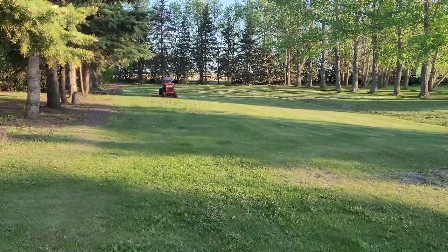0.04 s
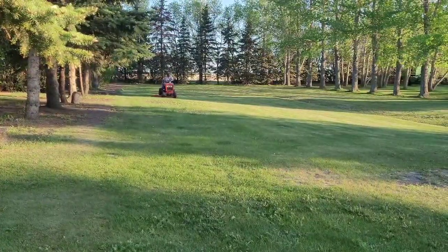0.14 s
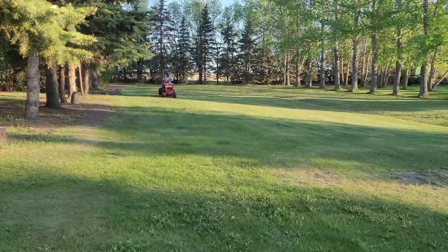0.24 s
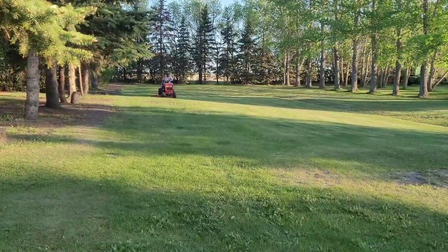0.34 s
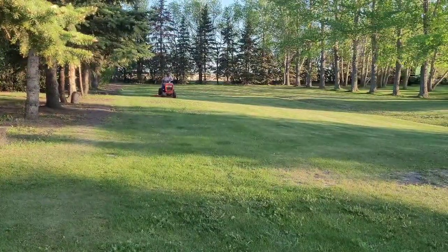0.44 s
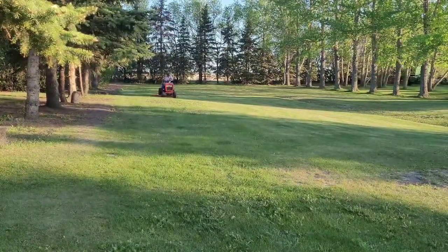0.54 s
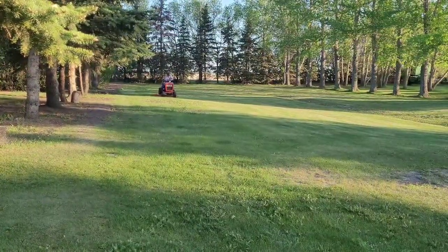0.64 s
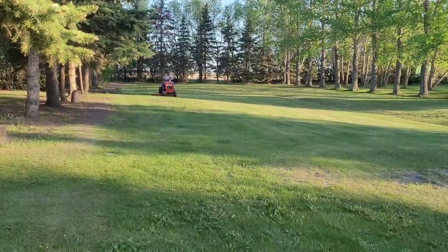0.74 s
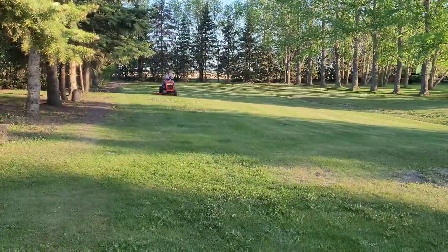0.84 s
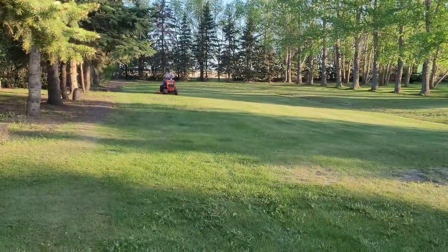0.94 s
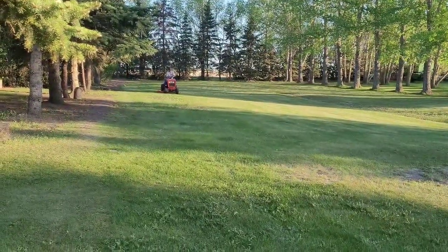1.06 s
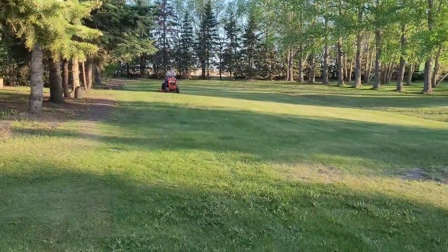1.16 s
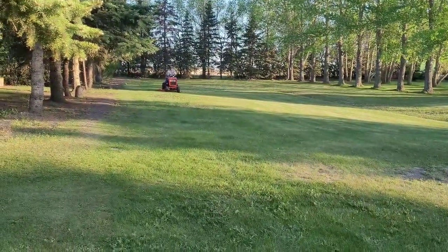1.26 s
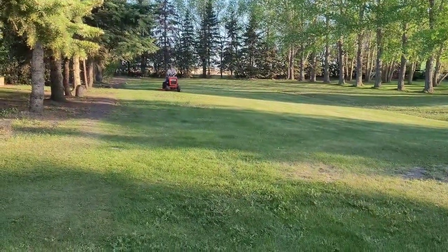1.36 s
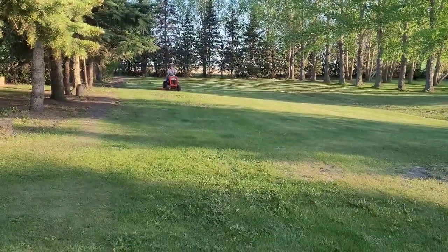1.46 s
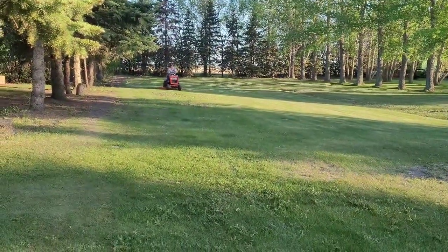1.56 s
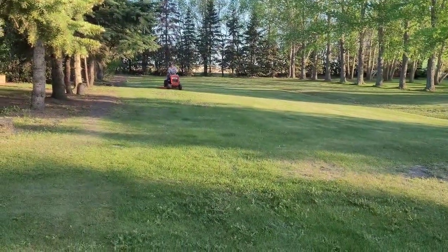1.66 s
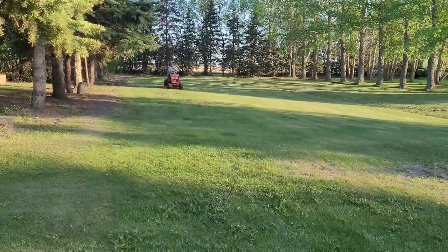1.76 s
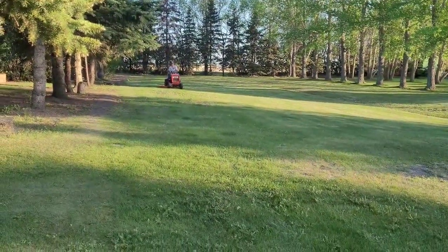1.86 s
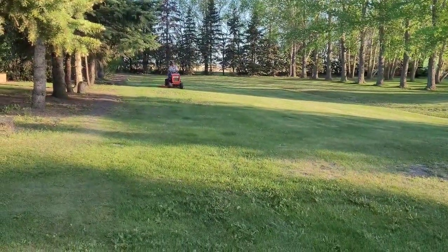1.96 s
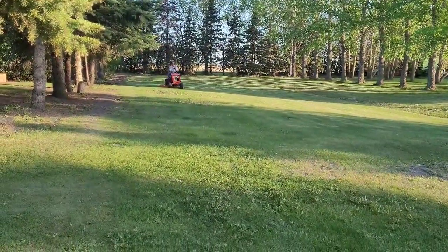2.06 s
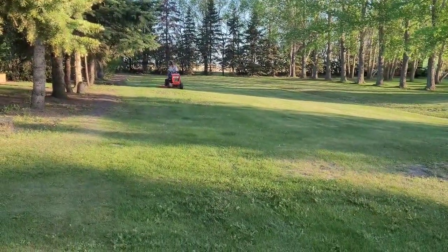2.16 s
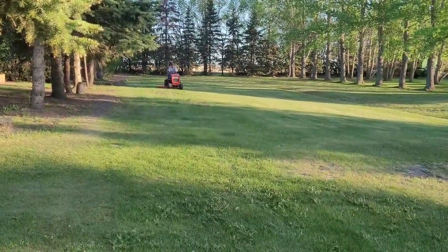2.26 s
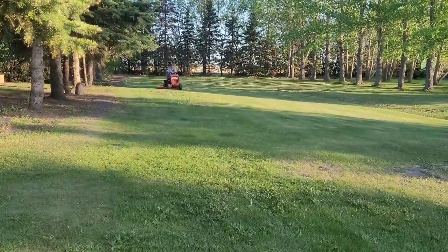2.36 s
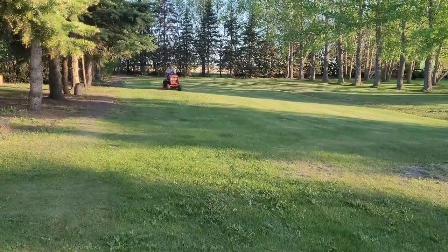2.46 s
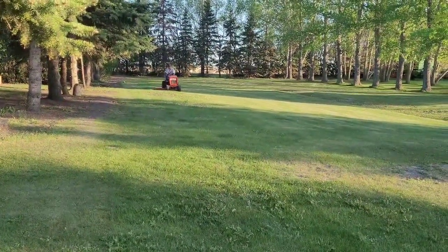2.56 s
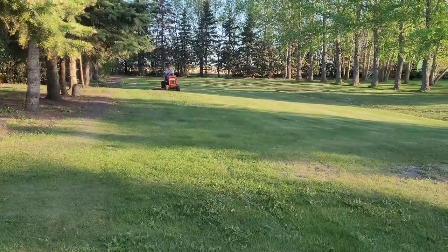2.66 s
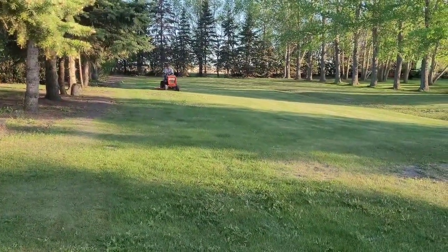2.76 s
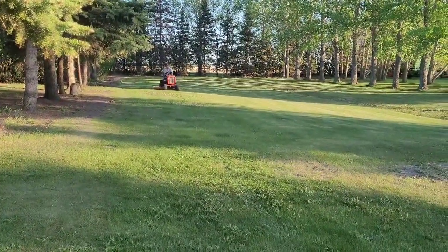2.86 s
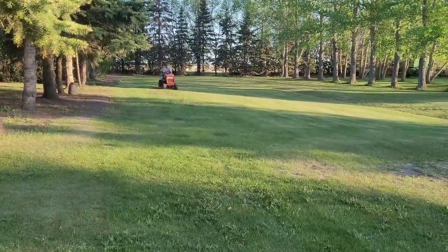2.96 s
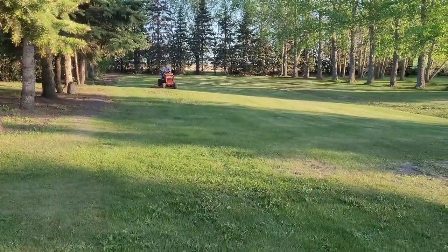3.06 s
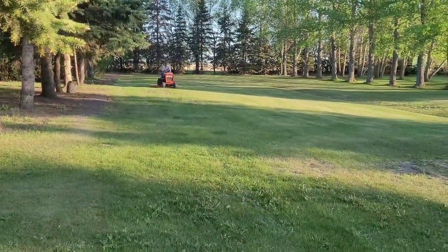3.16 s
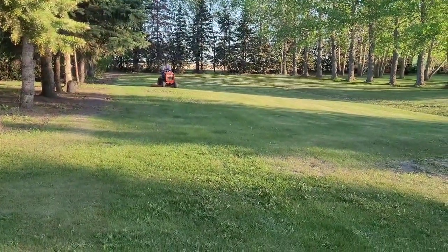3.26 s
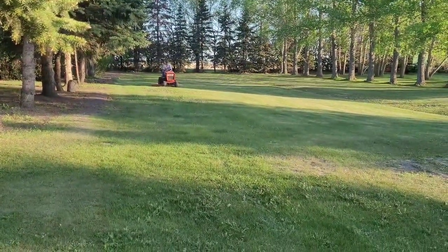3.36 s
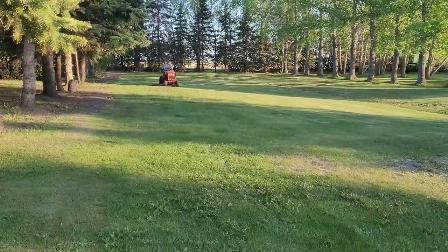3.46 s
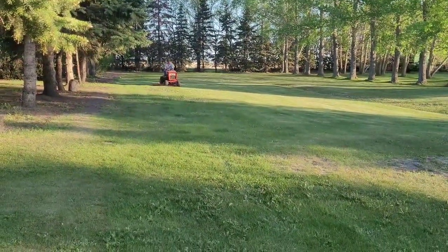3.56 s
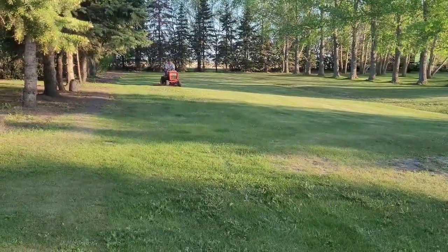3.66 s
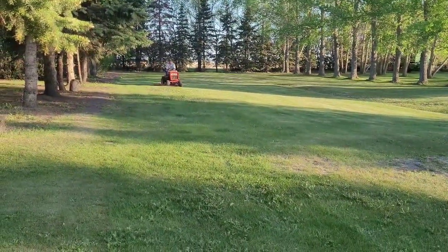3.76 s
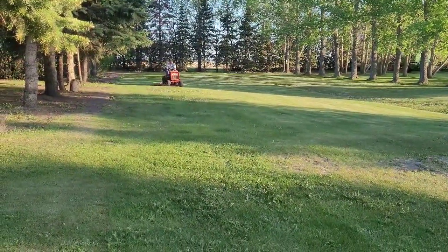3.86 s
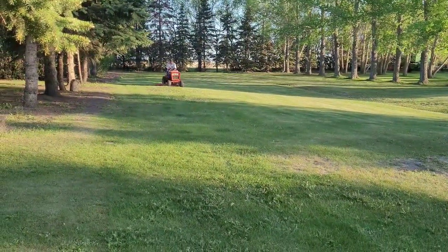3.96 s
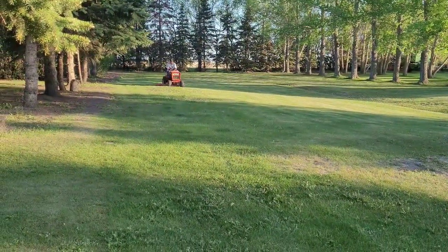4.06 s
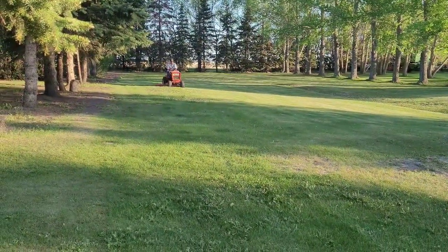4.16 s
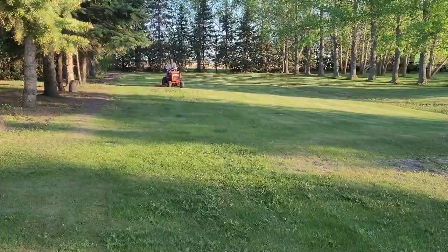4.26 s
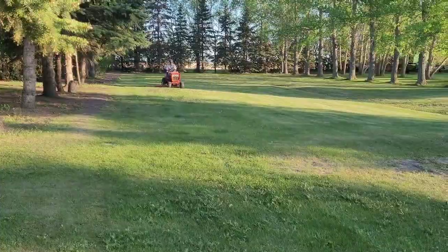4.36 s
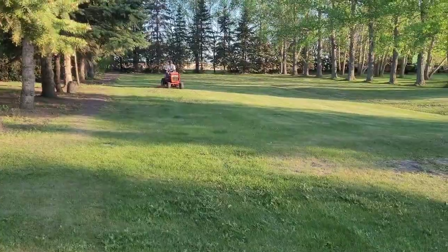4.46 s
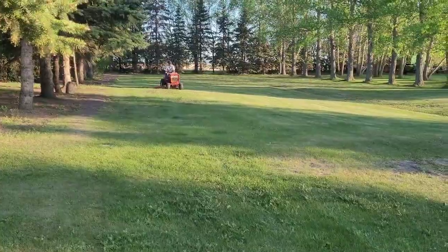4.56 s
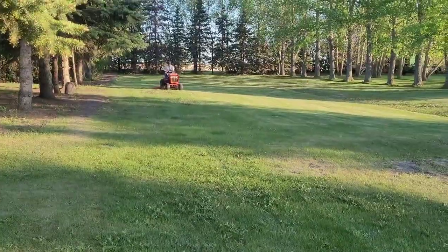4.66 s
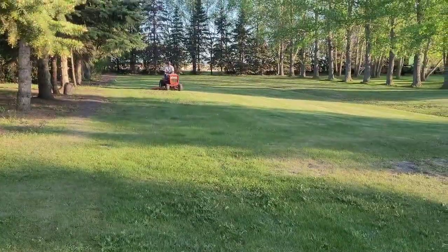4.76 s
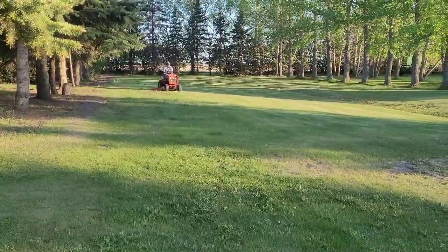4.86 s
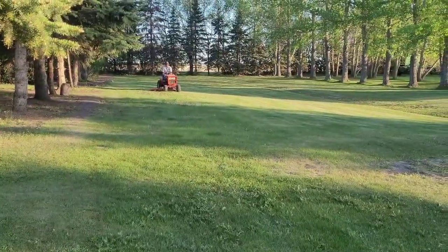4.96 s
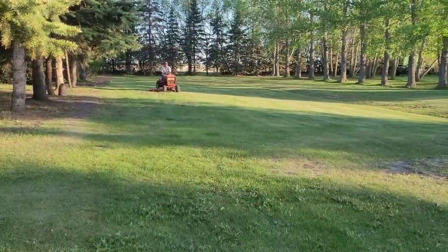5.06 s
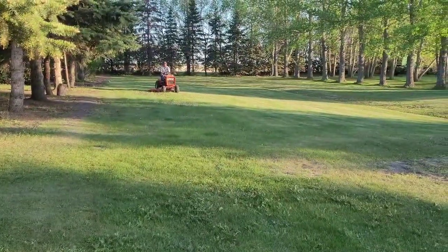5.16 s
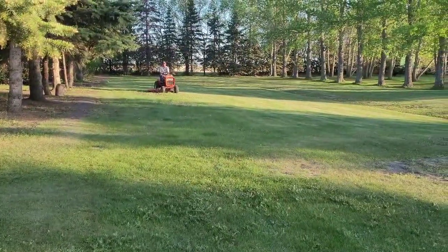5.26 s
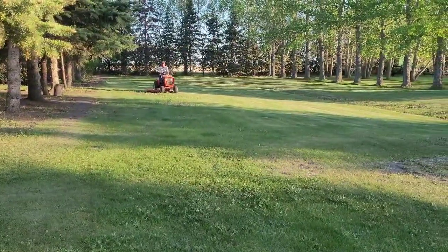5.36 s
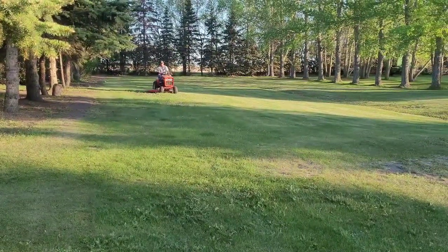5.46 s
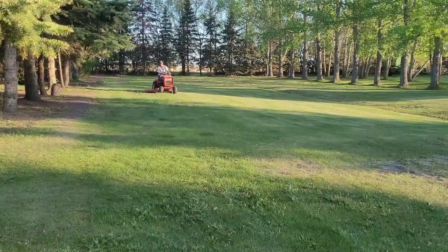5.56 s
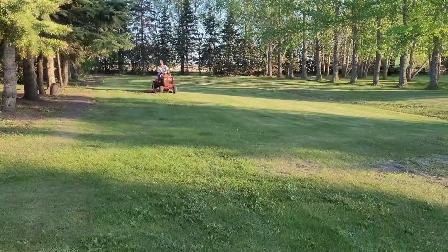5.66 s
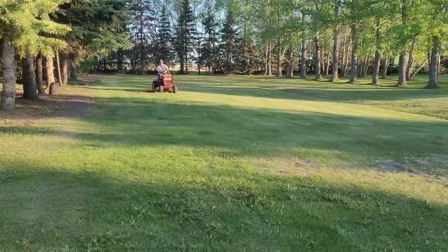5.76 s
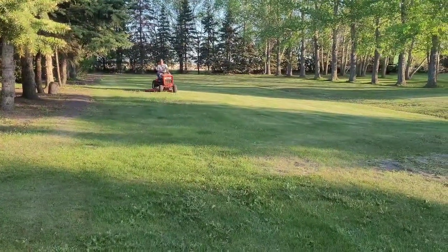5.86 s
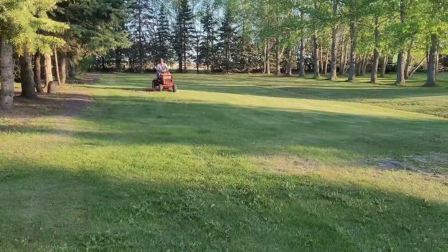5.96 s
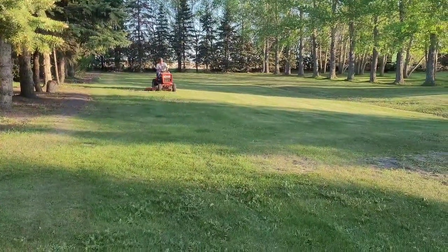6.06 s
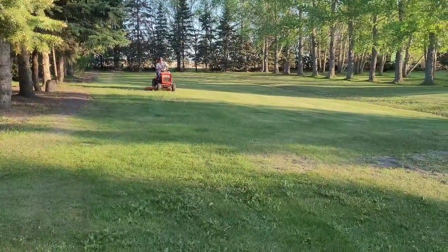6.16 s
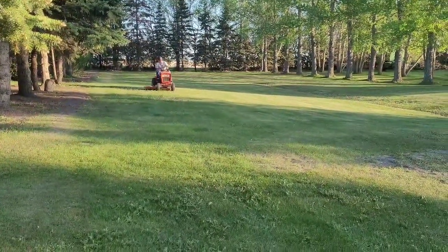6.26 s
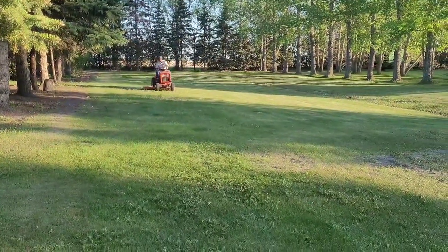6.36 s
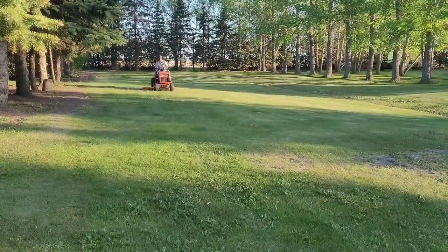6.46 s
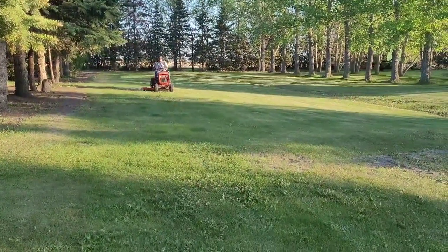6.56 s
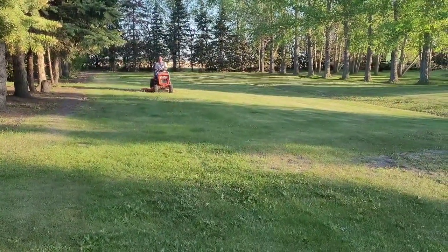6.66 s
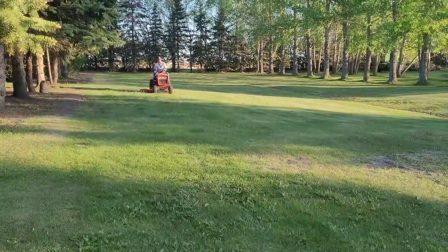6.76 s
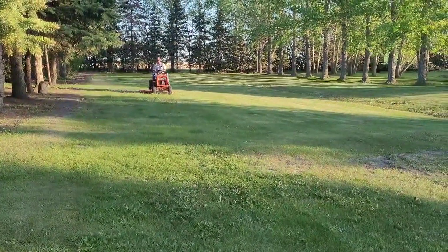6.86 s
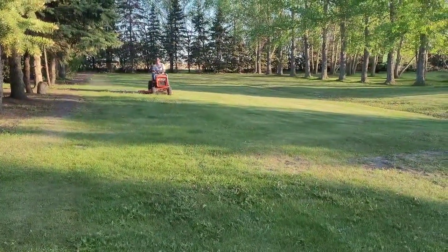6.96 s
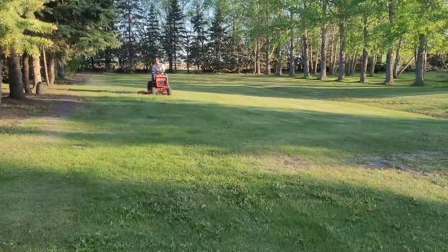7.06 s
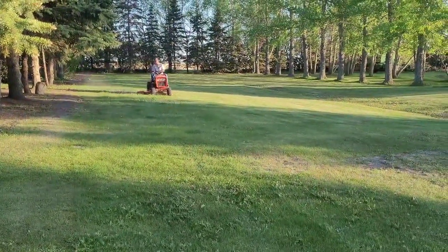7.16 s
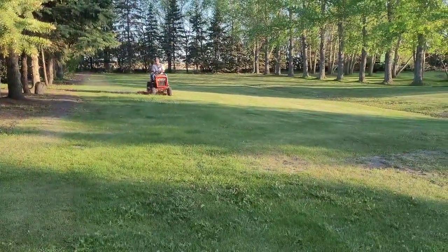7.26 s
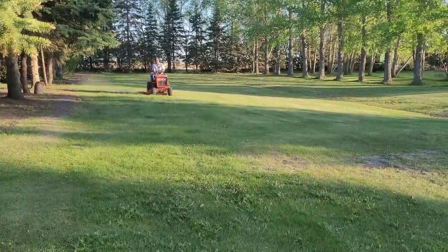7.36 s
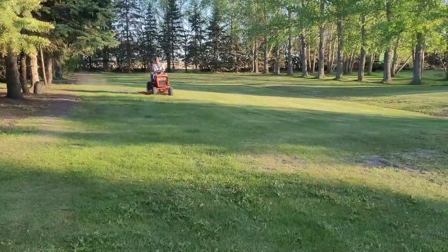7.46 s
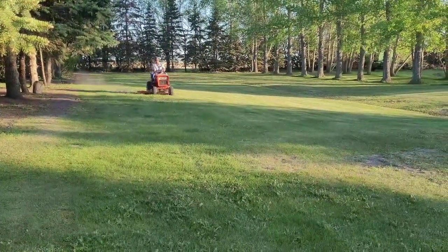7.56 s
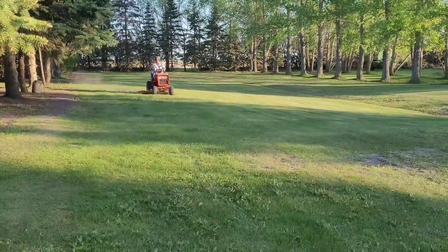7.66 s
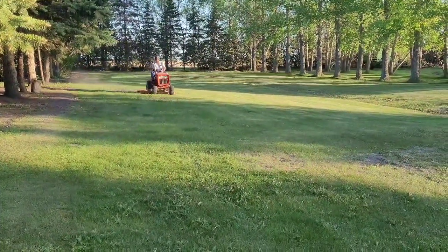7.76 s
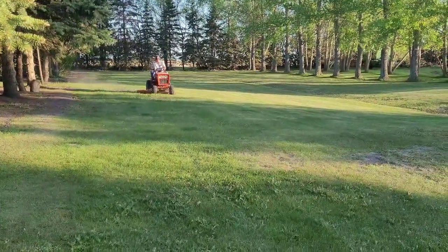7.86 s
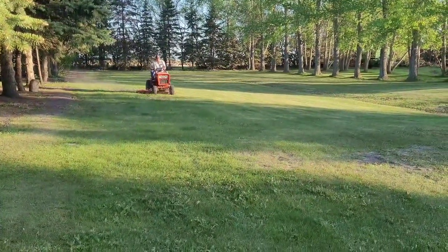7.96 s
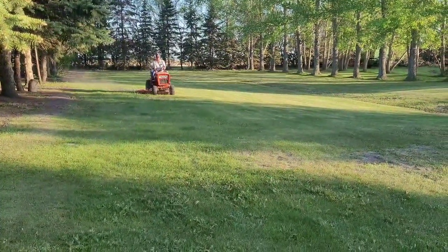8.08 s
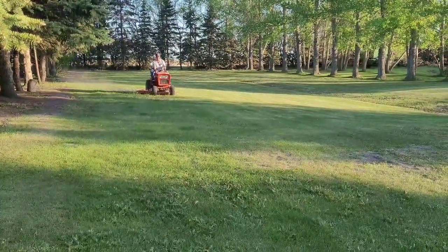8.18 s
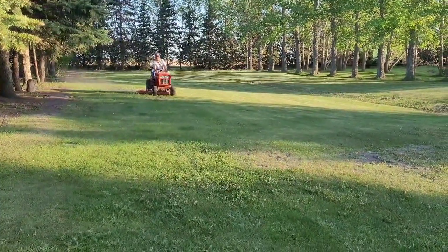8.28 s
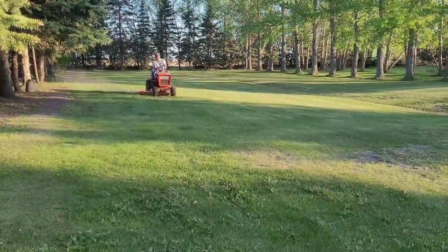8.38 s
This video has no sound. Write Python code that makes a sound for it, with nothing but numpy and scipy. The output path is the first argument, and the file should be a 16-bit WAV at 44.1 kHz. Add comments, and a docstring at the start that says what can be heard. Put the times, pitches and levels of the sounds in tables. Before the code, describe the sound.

A distant lawn tractor engine putters, sags, then sputters and climbs to working speed as it comes closer.

```python
"""A two-cylinder garden tractor approaches across a lawn ringed by trees. It idles, each firing a thump of
muffler resonance, a crack of turbulent gas and a soft puff, over the rush of the fan and the hiss of the
running gear; the trees scatter back a faint echo. The engine sags, and after 3 s the throttle opens.
One cylinder misfires around 4 s, then the engine barks and pulls up to working speed by 6 s:
the puffs vanish, the muffler's resonances climb, and it stumbles briefly once more near 7 s."""
import sys
import numpy as np
from scipy import signal
from scipy.fft import rfft, irfft, next_fast_len
from scipy.io import wavfile
from scipy.ndimage import map_coordinates

SR = 44100
rng = np.random.default_rng(int(sys.argv[2]) if len(sys.argv) > 2 else 0)


def put_to_file(sound):
    """Save the sound as 16-bit audio at rate SR, in the file named by the first command-line argument."""
    columns = np.atleast_2d(sound).T  # one column per channel
    safe = np.clip(columns, -1, 1)
    whole_steps = np.round(safe * 32767)
    wavfile.write(sys.argv[1], SR, whole_steps.astype(np.int16))


N = 371322
TIME = np.arange(N) / SR
PULSE = 8192  # samples in the sound of one firing
IDLE_RATE, WORKING_RATE = 24.6, 42  # firings per s
START_DISTANCE_M, DRIVE_M_PER_S = 39.6, 1.754


def from_db(db):
    """Amplitude ratio of a level in decibels."""
    return 10 ** (np.asarray(db) / 20)


def unit_power(x):
    """Normalisation to a mean square of 1."""
    return x / np.sqrt(np.mean(x ** 2) + 1e-20)


def at_time(points, times):
    """Linear interpolation in time."""
    return np.interp(times, *np.transpose(points))


def at_hz(points, size=PULSE):
    """Interpolation in log frequency onto an FFT grid."""
    hz, value = np.transpose(points)
    return np.interp(np.log(np.arange(size // 2 + 1) * SR / size + 1), np.log(hz), value)


def minimum_phase(db):
    """Causality: responses with these magnitudes that ring only after the excitation."""
    cepstrum = irfft(np.log(from_db(db)))
    cepstrum[..., 1:PULSE // 2] *= 2
    cepstrum[..., PULSE // 2 + 1:] = 0
    return np.exp(rfft(cepstrum))


def noise_pair(correlation, shape):
    """Partial coherence: two white noises with a shared part."""
    mid, side = rng.standard_normal((2, *shape))
    mid *= np.sqrt((1 + correlation) / 2)
    side *= np.sqrt((1 - correlation) / 2)
    return np.array([mid + side, mid - side])


def superpose(pulses, times):
    """Linear superposition of one pulse per firing."""
    out = np.zeros(N + 3 * PULSE)
    for pulse, t in zip(pulses, times):
        start = PULSE + int(t * SR)
        out[start:start + PULSE] += pulse
    return out[PULSE:PULSE + N]


# engine speed: t/s, firing rate/Hz
FIRING_RATE = [(0.0, 24.611), (0.745, 24.644), (1.348, 25.06), (1.814, 21.784), (1.951, 22.572),
               (2.717, 19.452), (3.153, 18.719), (3.641, 22.835), (4.018, 22.795), (4.394, 21.322),
               (4.807, 23.601), (5.218, 28.515), (5.825, 37.44), (6.146, 40.817), (6.707, 42.967),
               (7.03, 41.191), (7.731, 42.626), (8.188, 41.439), (8.42, 41.672)]
def firing_rate(times):
    """The repetition rate of the exhaust pulses is proportional to engine speed."""
    return at_time(FIRING_RATE, times)


# throttle position: t/s, opening (0 to 1)
THROTTLE = [(0, .03), (1.4, 0.15), (3.05, 0), (3.2, 0.56), (3.62, 0.76), (3.88, 0.89), (4.4, 0.74),
            (4.55, 0.84), (5.5, 1), (6.15, 0.73), (6.65, 0.54), (8.42, 0.41)]
def throttle(times):
    """The throttle meters the charge: it opens in steps, then eases near working speed."""
    return at_time(THROTTLE, times)


def source_level(times, idle_db, revs_db, throttle_db):
    """Level rises with engine speed and throttle, and by the inverse-square law as the tractor nears."""
    revs = (firing_rate(times) - IDLE_RATE) / (WORKING_RATE - IDLE_RATE)
    nearness_db = -20 * np.log10(1 - DRIVE_M_PER_S * times / START_DISTANCE_M)
    return idle_db + revs_db * revs + throttle_db * throttle(times) + nearness_db


def tree_echo(sound, echo_db=-10.5, t60_s=1.0, build_s=0.043, band_hz=(256, 6100)):
    """Scattering by trunks returns a dull, diffuse echo; long waves diffract around them."""
    age = np.arange(SR) / SR
    tail = noise_pair(0.68, age.shape) * from_db(-60 * age / t60_s) * (1 - np.exp(-age / build_s))
    tail /= np.sqrt(np.sum(tail ** 2) / 2)
    tail = signal.sosfilt(signal.butter(2, band_hz, "band", fs=SR, output="sos"), tail)
    return from_db(echo_db) * signal.fftconvolve(sound, tail, axes=1)[:, :N]


def fluttering_noise(spectrum, level_db, flutter_db, correlation, flutter_hz=22):
    """Random amplitude modulation: steady noise flutters a little on its way over the grass."""
    size = next_fast_len(N)
    white = rfft(noise_pair(correlation, (size,)))
    noise = irfft(white * from_db(at_hz(spectrum, size)), size)[:, :N]
    knots = rng.standard_normal(int(N / SR * flutter_hz) + 4)
    flutter = unit_power(map_coordinates(knots, [TIME * flutter_hz], order=2, mode="nearest"))
    return unit_power(noise) * from_db(level_db + flutter_db * flutter)


# relative spectral density of the running gear: f/Hz, level/dB
GEAR_SPECTRUM = [(1200, -12), (1900, -3.5), (2300, 2), (2700, 5), (3050, 6), (3400, 2.5), (4050, 2.5),
                 (4500, -5), (5700, 0), (6900, -7.5), (7900, -8), (9300, -14), (12500, -20.5), (15500, -39)]
def gear_hiss():
    """The running gear radiates broadband noise, strongest near 3 kHz."""
    level_db = source_level(TIME, idle_db=-56.5, revs_db=7.5, throttle_db=2.5)
    return fluttering_noise(GEAR_SPECTRUM, level_db, flutter_db=1.1, correlation=0.67)


# relative spectral density of the fan: f/Hz, level/dB
FAN_SPECTRUM = [(25, 8), (60, 6.5), (150, 10), (300, 9.5), (430, -4.5), (560, 1), (720, 1.5), (850, -0.5),
                (980, -9.5), (1150, -1), (1400, 1), (1620, -14), (1900, -4), (2600, -29)]
def fan_rush():
    """Turbulence in the fan's airflow radiates low broadband noise."""
    level_db = source_level(TIME, idle_db=-49, revs_db=10.5, throttle_db=4)
    return fluttering_noise(FAN_SPECTRUM, level_db, flutter_db=0.75, correlation=0.88)


# swells and dips of the thump: t/s, level/dB
THUMP_SWELL = [(0, -.5), (1.35, 0), (2.1, -0.5), (2.35, 1.6), (3.9, -1), (5.5, 1), (6.4, -.5), (7.3, -1.5),
               (7.6, 0.5)]
# one cylinder fails to catch: first t/s, last t/s, thump loss/dB, crack loss/dB
MISFIRES = [(3.74, 4.27, 8.5, 26), (4.36, 4.36, 5, 15), (4.46, 4.46, 5, 23), (6.74, 6.74, 4, 10),
            (6.76, 6.76, 7, 3), (6.85, 6.85, 10, 8), (6.97, 6.97, 3, 8)]
def firings(first_turn=0.118, weak_thump_db=-2, weak_crack_db=-4, scatter_db=0.48):
    """Phase is the integral of rate: on each whole turn the next cylinder fires, one of the two weaker."""
    turns = np.cumsum(firing_rate(TIME)) / SR - first_turn
    count = np.arange(int(turns[-1]) + 1)
    times, weak = np.interp(count, turns, TIME), count % 2
    thump_db = source_level(times, idle_db=-29.8, revs_db=2.17, throttle_db=2.5) + weak * weak_thump_db
    thump_db += at_time(THUMP_SWELL, times) + scatter_db * rng.standard_normal(len(times))
    crack_db = source_level(times, idle_db=-47.5, revs_db=3, throttle_db=19.5) + weak * weak_crack_db
    for first_s, last_s, thump_loss_db, crack_loss_db in MISFIRES:
        missed = slice(np.argmin(abs(times - first_s)), np.argmin(abs(times - last_s)) + 1, 2)
        thump_db[missed] -= thump_loss_db
        crack_db[missed] -= crack_loss_db
    return times, thump_db, crack_db


def piston_puffs(times, idle_db=-39, loss_db_per_hz=3, delay_turns=0.2394, band_hz=(121, 238)):
    """Displacement flow: the rising piston expels the remaining gas in a puff, strongest at idle."""
    rate = firing_rate(times)
    strength = from_db(idle_db - loss_db_per_hz * abs(rate - IDLE_RATE))
    band = signal.butter(5, band_hz, "band", fs=SR, output="sos")
    puff = signal.sosfilt(band, signal.unit_impulse(PULSE))
    puff /= np.sqrt(np.sum(puff ** 2) * IDLE_RATE / SR)
    return superpose(strength[:, None] * puff, times + delay_turns / rate)


# tailpipe resonances: f/Hz, bandwidth/Hz, lift/dB
PIPE_MODES = [(1304, 330, 11.7), (1948, 440, 7.8), (2295, 177, 8), (3422, 450, 11.5), (4070, 460, 9.8),
              (5150, 91, 10.7), (7820, 620, 8.5), (12280, 190, 6)]
# firings that bark: t/s, extra crack level/dB, f/Hz near the mode that rings out
BARKS = [(1.258, 5.5, 3400), (1.379, 3, 3400), (3.867, 2, 3400), (3.955, 3.5, 3400), (4.044, 2.5, 3400),
         (4.548, 6, 3400), (4.637, 7, 3400), (4.893, 5.5, 2287), (5.087, 3.5, 3400), (5.459, 2, 2287),
         (5.78, 3.5, 3400), (5.859, 4, 3400), (6.064, 2.5, 2287), (6.479, 7.5, 3400), (6.831, 4.5, 1936),
         (7.168, 2.5, 1936), (7.832, 5, 2287)]
def tailpipe(times, ring_db=8, scatter_db=2.8):
    """Each stroke excites the pipe's modes in its own proportions; a bark is louder and favours one."""
    mode_hz, width_hz, lift_db = np.transpose(PIPE_MODES)
    mode_db = lift_db + scatter_db * rng.standard_normal((len(times), len(mode_hz)))
    bark_db = np.zeros(len(times))
    for t, extra_db, ring_hz in BARKS:
        firing = np.argmin(abs(times - t))
        bark_db[firing] = extra_db
        mode_db[firing, np.argmin(abs(mode_hz - ring_hz))] += ring_db
    hz = np.arange(PULSE // 2 + 1) * SR / PULSE
    peaks = 1 / (1 + (2 * (hz - mode_hz[:, None]) / width_hz[:, None]) ** 2)
    return mode_db @ peaks, bark_db


# relative spectrum of the escaping gas: f/Hz, level/dB
GAS_SPECTRUM = [(250, -3.5), (500, -5.5), (750, -4), (980, -10.5), (1650, -6), (2100, -2), (2900, -3.5),
                (3700, -2.5), (4500, -12), (5600, -4), (6900, -8.5), (9500, -14), (12000, -12.5),
                (15500, -15.5)]
def gas_cracks(times, level_db, lead_s=0.0036, rise_s=0.0007, decay_s=0.0044, tail_s=0.017):
    """Blowdown: the valve releases turbulent gas that rings the pipe and fades as the cylinder empties."""
    age = np.arange(PULSE // 4) / SR
    decay_scatter, level_scatter = rng.standard_normal((len(times), 2)).T
    blowdown = np.exp(-age / (decay_s * from_db(2 * decay_scatter[:, None])))
    tail = from_db(-9) * np.exp(-age / tail_s)
    envelope = (1 - np.exp(-(age / rise_s) ** 2)) * (blowdown + tail)
    bursts = envelope * noise_pair(0.65, envelope.shape)
    # the pressure front steepens into a small shock on its way down the pipe
    bursts[:, :, np.searchsorted(age, rise_s)] += from_db(12.5)
    resonance_db, bark_db = tailpipe(times)
    # the treble is dull from afar and sharpens on approach; an open throttle dulls it slightly
    treble_db = -2.5 + 0.55 * DRIVE_M_PER_S * times - 0.5 * throttle(times)
    shelf_db = treble_db[:, None] * at_hz([(4000, 0), (11000, 1)])
    pulses = irfft(rfft(bursts, PULSE) * minimum_phase(at_hz(GAS_SPECTRUM) + resonance_db + shelf_db))
    energy = np.mean(np.sum(pulses ** 2, axis=2, keepdims=True), axis=0)
    pulses /= np.sqrt(energy / (0.005 * SR))
    pulses *= from_db(level_db + bark_db + 1.78 * level_scatter)[:, None]
    return np.array([superpose(channel, times - lead_s) for channel in pulses])


# relative muffler response at low and at high engine speed: f/Hz, level/dB
SLOW_MUFFLER = [(20, -16), (38, -45), (50, 0), (72, -2), (108, 5.5), (125, -1.5), (150, -8), (190, -10.5),
                (230, -5), (270, -15.5), (320, -29.5), (400, -39.5), (800, -60), (3000, -110)]
FAST_MUFFLER = [(20, -76), (42, -27), (62, -8), (84, -11), (105, -4.5), (126, 1), (165, -11.5), (210, -6),
                (252, -13.5), (295, -20), (340, -29), (420, -45), (800, -57), (3000, -110)]
# upper bass, stronger in a harder gas pulse: t/s, level/dB
HARDNESS = [(0, 0.5), (1.4, 1), (2.2, -5), (4.6, -7.5), (5.7, 7.5), (6.4, 2), (7.2, 1), (8.42, -5)]
def muffler_thumps(times, level_db, lead_s=0.00522, slow_rate=34.0, fast_rate=43.2, scatter_db=3.0):
    """Impulse response: each slug of gas rings the muffler, whose resonances climb with engine speed."""
    fast = np.clip((firing_rate(times) - slow_rate) / (fast_rate - slow_rate), 0, 1)[:, None]
    response_db = (1 - fast) * at_hz(SLOW_MUFFLER) + fast * at_hz(FAST_MUFFLER)
    # no two burns are equally hard
    hardness_db = at_time(HARDNESS, times) + scatter_db * rng.standard_normal(len(times))
    shelf_db = hardness_db[:, None] * at_hz([(100, 0), (300, 1)])
    pulses = irfft(minimum_phase(response_db + shelf_db))
    energy = np.sum(pulses ** 2, axis=1, keepdims=True)
    pulses /= np.sqrt(energy / (0.02 * SR))
    return superpose(pulses * from_db(level_db)[:, None], times - lead_s)


def scene():
    """Sound pressures add: fan, running gear and echo lie beneath the direct exhaust."""
    times, thump_db, crack_db = firings()
    exhaust = muffler_thumps(times, thump_db) + piston_puffs(times) + gas_cracks(times, crack_db)
    return fan_rush() + gear_hiss() + tree_echo(exhaust) + exhaust


# left channel minus right: f/Hz, level/dB
LEVEL_DIFFERENCE = [(120, -0.5), (380, 0.5), (700, 2), (1290, 3.5), (2380, 2), (4400, 5.5), (8120, 2),
                    (15000, 4)]
# lead of the left channel: f/Hz, phase/rad
PHASE_DIFFERENCE = [(25, 0.45), (120, 0.29), (250, 0.24), (600, 0.53), (1300, 0.67), (2500, 1.23),
                    (4500, 1.85), (8000, 3.62), (12000, 5), (16000, 9.3)]
def record(dry, cutoff_hz=15900):
    """Two microphone ports receive the field at different levels and phases; a low-pass cuts the top."""
    size = next_fast_len(N + PULSE)
    left, right = rfft(dry, size)
    lean = from_db(at_hz(LEVEL_DIFFERENCE, size) / 2)
    lag = np.exp(-1j * at_hz(PHASE_DIFFERENCE, size))
    ports = irfft(np.array([left * lean, right / lean * lag]), size)[:, :N]
    return signal.sosfilt(signal.ellip(10, 0.1, 70, cutoff_hz, fs=SR, output="sos"), ports)


dry = scene()
out = record(dry)
put_to_file(out)
```